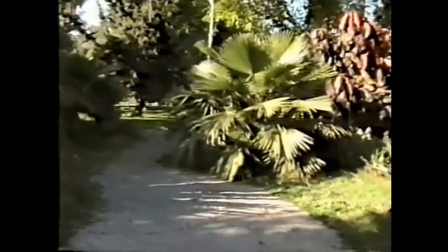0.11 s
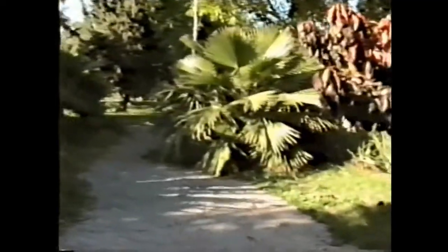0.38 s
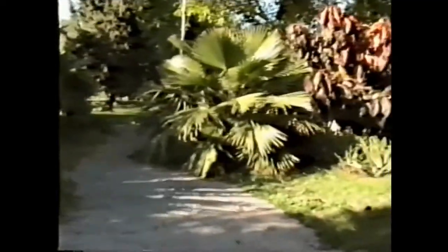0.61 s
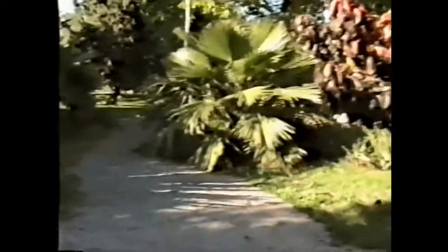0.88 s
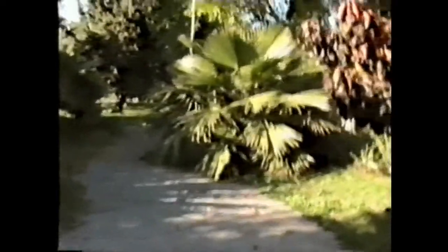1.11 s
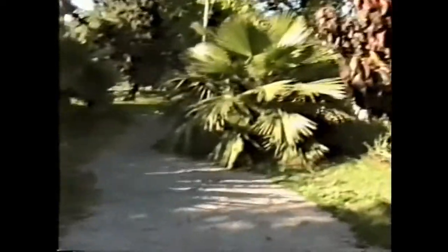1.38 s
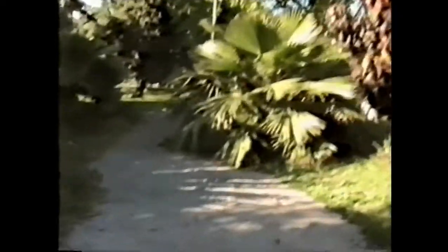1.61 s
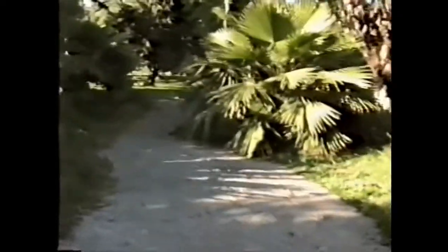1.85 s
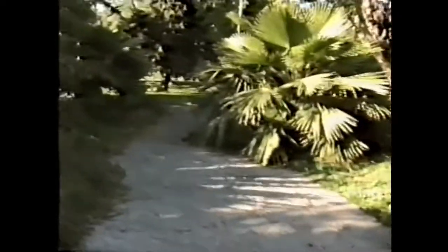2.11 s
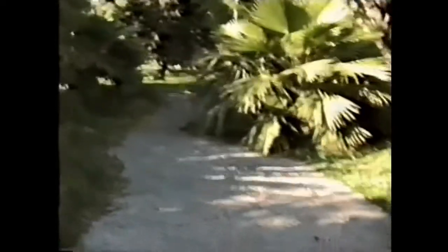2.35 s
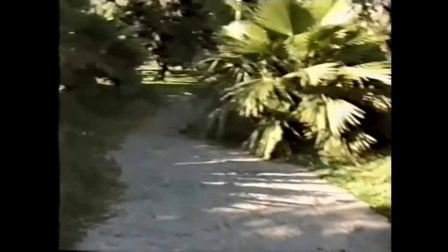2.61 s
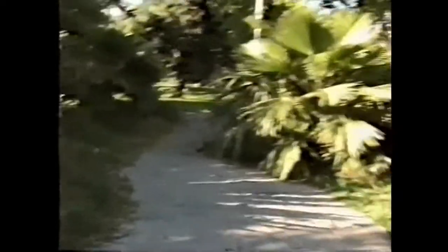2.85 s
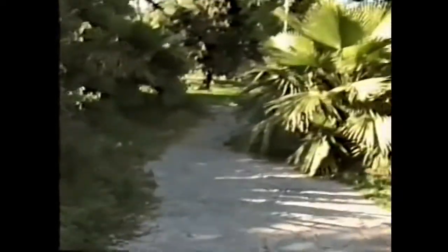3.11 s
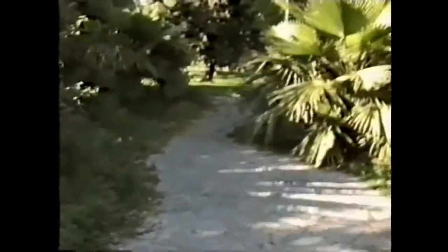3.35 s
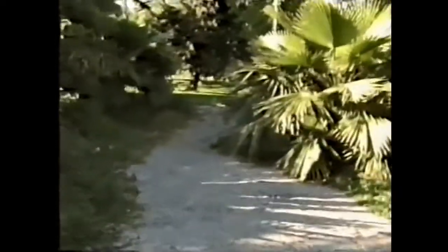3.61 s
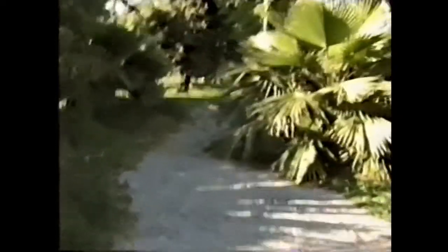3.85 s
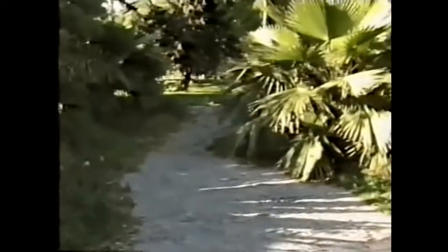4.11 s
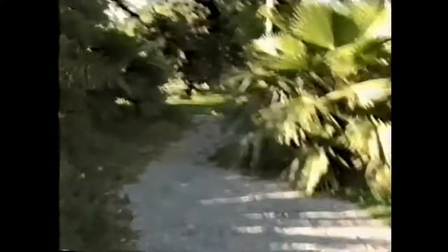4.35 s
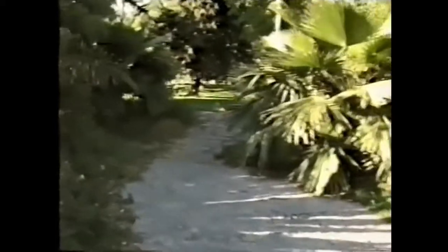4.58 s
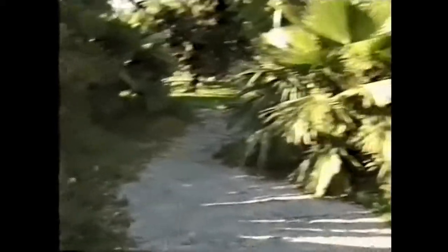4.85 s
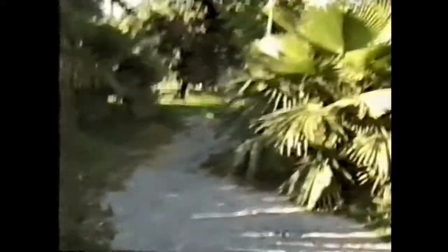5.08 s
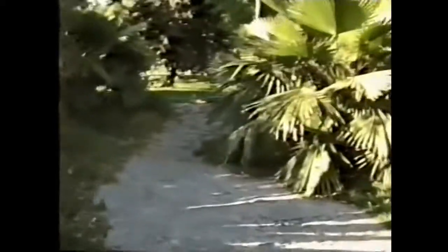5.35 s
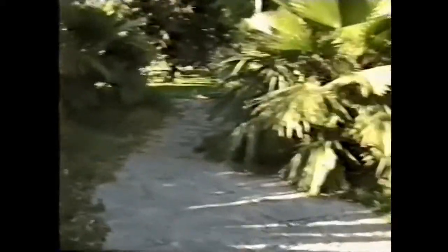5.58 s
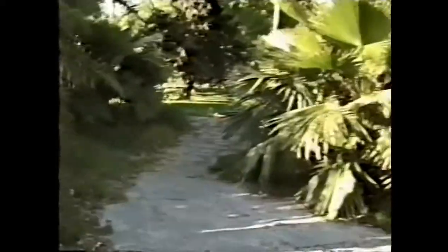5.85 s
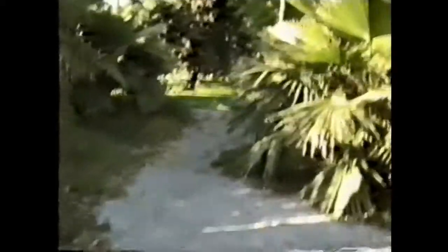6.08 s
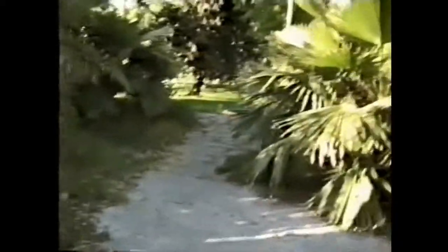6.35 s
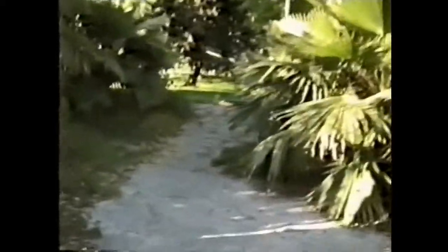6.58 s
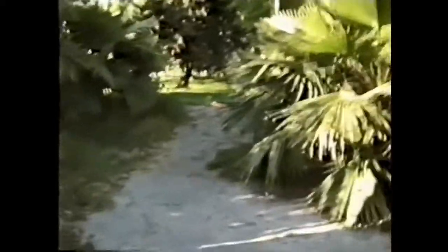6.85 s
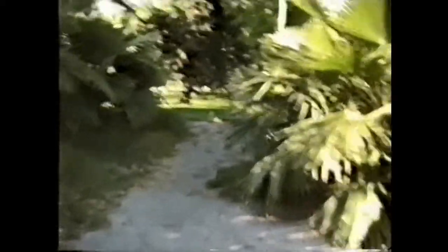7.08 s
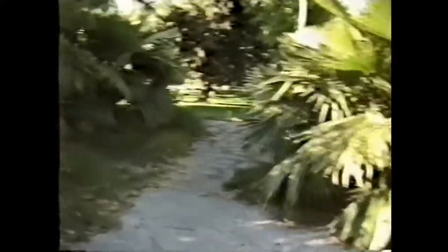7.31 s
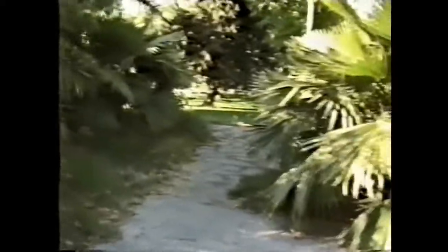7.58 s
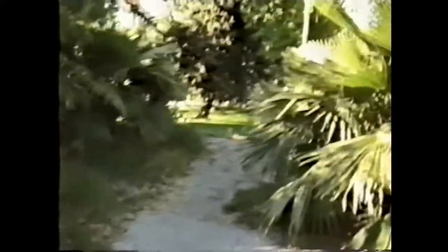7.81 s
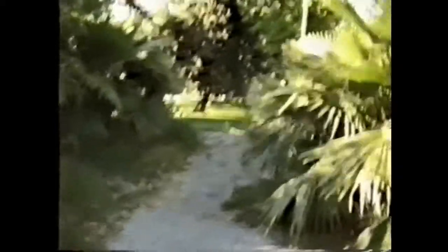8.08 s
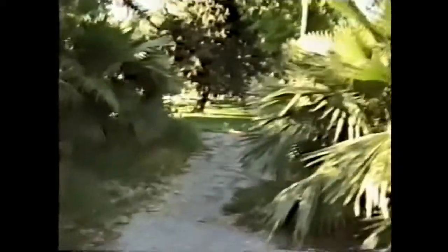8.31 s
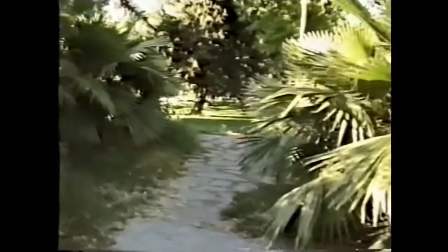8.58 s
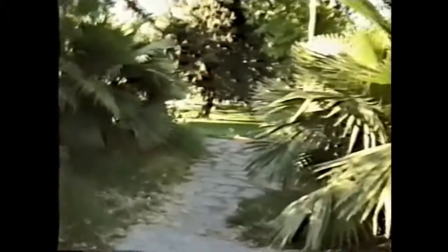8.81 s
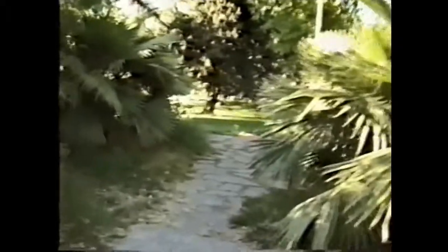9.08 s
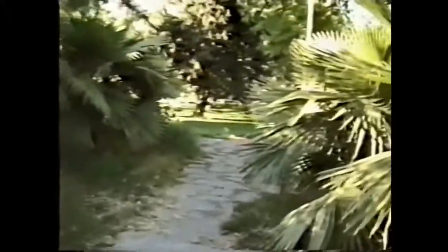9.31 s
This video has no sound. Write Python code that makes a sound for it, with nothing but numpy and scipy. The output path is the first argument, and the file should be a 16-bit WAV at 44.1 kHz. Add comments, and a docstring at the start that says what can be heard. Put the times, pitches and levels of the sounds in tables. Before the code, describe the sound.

Busy birdsong with loud whistles, thin seeps and rasping chatter over slow gravel footsteps, soft dove coos and leaf hiss.

```python
"""Throughout, far traffic rumbles under a hiss of leaves and distant chirps, and the recorder whines faintly (noise, tones).
From the start a dove coos softly, a warble opens and a walker's shoes snap and scuff gravel (rings, noise grains).
Many small birds follow with two-voiced calls, whistles, thin seeps, harsh notes and burrs (trembling near sines).
Later comes fast, rasping chatter, and a far engine hums towards the end. Trees echo song and steps (scattered taps);
the loudest notes overload the input."""
import sys
import numpy as np
from scipy import signal
from scipy.fft import rfft, irfft
from scipy.io import wavfile
from scipy.ndimage import uniform_filter1d

SR = 44100
rng = np.random.default_rng(int(sys.argv[2]) if len(sys.argv) > 2 else 0)


def amplitude_ratio(level_db):
    """Convert a level in decibels to the matching linear amplitude (field) ratio."""
    exponent = np.asarray(level_db, float) / 20
    return 10 ** exponent


def unload_audio(sound):
    """Save the sound as a 16-bit wav file, at the path given as the first command line argument."""
    columns = np.transpose(np.atleast_2d(sound))
    # keep every value between -1 and 1, then stretch to whole-number steps
    steps = np.round(np.clip(columns, -1, 1) * 32767)
    wavfile.write(sys.argv[1], SR, steps.astype(np.int16))


N = 416304

# colour of crushed grit, relative: (frequency [Hz], density [dB per Hz])
GRIT_COLOUR = [(410, -34.5), (700, -25), (940, -8), (2140, 13), (10200, -1.5), (15000, -19)]


def evened(x):
    """Scales a signal to rms 1."""
    return x / np.sqrt(np.mean(x ** 2) + 1e-20)


def read(points, hz):
    """Reads a curve over log frequency."""
    f, value = np.transpose(points)
    return np.interp(np.log(hz + 1), np.log(f + 1), value)


def add(mix, s, sound):
    """Lays a sound into the mix at s seconds, cut at the end of the scene."""
    part = mix[round(s * SR):][:len(sound)]
    part += sound[:len(part)]


def curves(rows):
    """Columns at every sample, corners rounded over about 1 ms."""
    s, *columns = np.transpose(rows)
    t = np.arange(s[0], s[-1], 1 / SR)
    return [uniform_filter1d(np.interp(t, s, c), size=50, mode="nearest") for c in columns]


def coloured(x, points):
    """Filters x by a spectrum."""
    return irfft(rfft(x) * amplitude_ratio(read(points, np.fft.rfftfreq(len(x), 1 / SR))), len(x))


def faded(x, fade_s=0.0026):
    """Soft ends."""
    k = np.arange(len(x))
    return x * np.clip(np.minimum(k, k[::-1]) / (fade_s * SR), 0, 1)


def wobble(count, size):
    """Smooth chance of rms 1, changing about every size samples."""
    return evened(uniform_filter1d(uniform_filter1d(rng.standard_normal(count), size), size))


def voice(hz, db, waver=0.00681, flutter=0.3943, overtone_db=0, fade_s=0.00092, rasp=0., smear=0.):
    """A near sine trembling in pitch and strength; rasp roughens it, turbulence smears overtones into hiss."""
    # overtones against the fundamental, before overtone_db: (frequency [Hz], level [dB])
    throat = [(3000, -23), (7000, -25), (9800, -34.5), (12000, -33), (15000, -90)]
    hz = hz * (1 + waver * wobble(count=len(hz), size=120))
    turn = 2 * np.pi * np.cumsum(hz) / SR
    overtones = sum(amplitude_ratio(read(throat, k * hz)) * np.sin(k * turn) for k in range(2, 6))
    overtones = overtones * (1 - smear + smear * wobble(count=len(hz), size=8))
    tone = np.sin(turn) + amplitude_ratio(overtone_db) * overtones
    tremble = flutter * wobble(count=len(hz), size=200)
    roughness = rasp * wobble(count=len(hz), size=9)
    return faded(np.sqrt(2) * amplitude_ratio(db) * (1 + tremble + roughness) * tone, fade_s)


def glide(s, length, first_hz, last_hz, db, peak, start_db, end_db, bend):
    """Rows (time [s], pitch [Hz], level [dB]) of a note that slides one way while it swells and fades."""
    u = np.linspace(0, 1, 25)
    hz = last_hz + (first_hz - last_hz) * (1 - u) ** bend
    swell_db = np.interp(u, [0, np.clip(peak, .02, .98), 1], [start_db, 0, end_db])
    return np.transpose([s + length * u, hz, db + swell_db])


def arch(s, length, foot_hz, top_hz, db, top_at, edge_db, rounded):
    """Rows (time [s], pitch [Hz], level [dB]) of a note whose pitch and level rise and fall together."""
    u = np.linspace(0, 1, 25)
    height = np.sin(np.pi * np.interp(u, [0, top_at, 1], [0, .5, 1])).clip(0) ** rounded
    return np.transpose([s + length * u, foot_hz + (top_hz - foot_hz) * height, db + edge_db * (1 - height)])


def traffic_and_leaves(patchy_db=2.0):
    """Noise split at 900 Hz: rumble below and hiss above swell separately, in drifting patches."""
    # colour of the open air, relative within each part: (frequency [Hz], density [dB per Hz])
    air = [(18, -76.5), (30, -90.5), (214, 0.5), (660, -10), (773, -16.5), (1530, -9.5), (1740, -9),
           (2940, -11.5), (3180, -12), (4840, -23), (15700, -34)]
    # background: (time [s], traffic rumble level [dB], far chorus and leaves level [dB])
    swell = [(0.0, -39, -34.5), (2.92, -38, -36), (9.44, -33, -31.5)]
    frames, hz = N // 256 + 5, np.fft.rfftfreq(1024, 1 / SR)
    a, b, patches = rng.standard_normal((frames, 513, 3)).T
    patches = evened(uniform_filter1d(uniform_filter1d(patches, size=10, axis=0), size=14, axis=1))
    z = (a + 1j * b) * amplitude_ratio(read(air, hz)[:, None] + patchy_db * patches)
    low = (hz < 900)[:, None]
    rumble, hiss = (evened(signal.istft(z * m, nperseg=1024, noverlap=768)[1][:N]) for m in (low, ~low))
    s, rumble_db, hiss_db = np.transpose(swell)
    t = np.arange(N) / SR
    return rumble * amplitude_ratio(np.interp(t, s, rumble_db)) + hiss * amplitude_ratio(np.interp(t, s, hiss_db))


def recorder_whine():
    """A faint, slightly unsteady tone around 1500 Hz that never stops."""
    return voice(np.full(N, 1500.0), -47, waver=0.00328, overtone_db=-27.0)


def dove():
    """Soft coos: low, nearly pure tones with slow edges."""
    # one table a coo: (time [s], pitch [Hz], level [dB])
    coos = [
        [(0, 352, -37), (.22, 303.4, -46)],
        [(3.151, 395.4, -37.5), (3.269, 440.4, -37), (3.391, 473.1, -34)],
        [(5.59, 233.2, -39), (5.72, 313, -39.5)],
        [(5.85, 449, -35), (5.97, 570.5, -43.5)],
    ]
    mix = np.zeros(N)
    for rows in coos:
        add(mix, rows[0][0], voice(*curves(rows), flutter=0.307, overtone_db=-40, fade_s=0.0068))
    return mix


def whistle(rows):
    """A clean note with weak overtones."""
    return voice(*curves(rows), overtone_db=-6)


def flock():
    """Short falling chirps of distant birds at random times and pitches."""
    chirps_per_s, faintest_db = 45, -54
    mix = np.zeros(N)
    for when, pitch, fall, length, size in rng.random((round(chirps_per_s * N / SR), 5)):
        hz, db = 2000 * 3.6 ** pitch, faintest_db + 9 * size
        add(mix, when * N / SR, whistle([(0, hz * (1 + 0.33 * fall), db), (.02 + .06 * length, hz, db)]))
    return mix


def warble(rows):
    """The pitch swings up and down quickly, nearly in time, and the level swings with it."""
    hz, db, swing_hz, per_s, top_db = curves(rows)
    swing = np.cos(2 * np.pi * np.cumsum(per_s * (1 + .08 * wobble(count=len(hz), size=500))) / SR)
    swing = 2 * ((1 + swing) / 2) ** .65 - 1  # lingers at the top and dips briefly
    swing_db = top_db * swing * swing_hz / swing_hz.max()
    return voice(hz + swing_hz * swing, db + swing_db, waver=0.0082, overtone_db=-8.0)


def warbles():
    """Warbles begin plain, then open their swing from the top."""
    # one pair a warble: (swing [Hz], rate [swings per s], gain at the top [dB], plain lead [s]),
    # then its line: (time [s], centre pitch [Hz], level [dB])
    long_warbles = [ ((237, 60.7, 1.14, 0.00728), [(.058, 2079, -24.5), (.072, 2083, -14.5),
                    (.115, 2010, -15.5), (.145, 2246, -13.5), (.17, 2494, -8.5), (.19, 2694, -8),
                    (.205, 2670, -30)]), ((485, 16, -0.5, .06), [(1.912, 7860, -37.5), (1.93, 8150, -30),
                    (1.958, 6720, -26.5), (1.985, 7022, -22), (2.04, 6975, -21.5), (2.15, 6436, -33.5)]),
                    ((370, 59.4, 5, .033), [(5.968, 2575, -24.5), (6.0, 2652, -12.5), (6.045, 2700, -9),
                    (6.13, 2780, -9.5), (6.2, 2680, -10.5), (6.23, 2480, -13), (6.26, 2250, -14),
                    (6.3, 2080, -16), (6.36, 2030, -21)]), ((313, 60, 1.23, 0.00085), [(9.15, 2048, -24.5),
                    (9.2, 1992, -22), (9.3, 2352, -24), (9.335, 2249, -33), (9.36, 2170, -18),
                    (9.44, 2354, -21)]), ]
    grow_s = 0.0206
    notes = []
    for (swing, per_s, top_db, lead), rows in long_warbles:
        s, centre_hz, level_db = np.transpose(rows)
        t = np.linspace(0, s[-1] - s[0], 200)
        hz, db = np.interp(s[0] + t, s, centre_hz), np.interp(s[0] + t, s, level_db)
        opening = swing * np.clip((t - lead) / grow_s, 0, 1)
        rate = per_s * np.clip((t - lead) * 1000 + .5, 0, 1)
        notes.append(np.transpose([s[0] + t, hz, db, opening, rate, np.full(200, top_db)]))
    return notes


def snaps():
    """Grit snapping underfoot: a noisy crack and a short ring."""
    # (time [s], level [dB], ring [Hz])
    grit_snaps = [(0.125, -18.5, 3158), (.228, -27.5, 6545), (0.504, -22.5, 1295), (0.6115, -20, 2530),
                  (1.07, -18.5, 1123), (1.484, -12, 1150), (2.184, -18, 3870), (2.2247, -18, 4023),
                  (2.245, -20.5, 2329), (2.605, -20, 3200), (2.672, -10, 1680), (2.779, -21.5, 3610),
                  (3.394, -23.5, 4370), (3.7778, -16, 1865), (4.218, -13, 1195), (4.366, -18, 3690),
                  (4.9902, -11, 1930), (5.381, -24.5, 1059), (5.7266, -23.5, 3600), (5.758, -21.5, 3630),
                  (5.957, -19, 2650), (6.361, -12.5, 1300), (7.867, -21.5, 2550), (8.08, -18.5, 3435),
                  (8.132, -21.5, 3390)]
    ring_t60_s, crack_t60_s, crack_share = 0.0124, 0.0514, 0.429
    mix, t = np.zeros(N), np.arange(700) / SR
    for s, db, hz in grit_snaps:
        ring = np.sin(2 * np.pi * hz * t) * amplitude_ratio(-60 * t / ring_t60_s)
        crack = evened(coloured(rng.standard_normal(len(t)), GRIT_COLOUR)) * amplitude_ratio(-60 * t / crack_t60_s)
        add(mix, s, amplitude_ratio(db) * (ring + crack_share * crack))
    return mix


def duet(rows, even=0.268, odd=1.0):
    """Two voices share one airway, so sum and difference tones appear; the beak passes the middle treble best."""
    low_hz, low_db, high_hz, high_db = curves(rows)
    low = voice(low_hz, low_db, flutter=0.038, overtone_db=-29.5)
    both = low + voice(high_hz, high_db, flutter=0.025, overtone_db=-29.5)
    flow = both / (np.sqrt(2) * (amplitude_ratio(low_db) + amplitude_ratio(high_db)))
    mixed = both * (0.595 + even * flow + odd * flow ** 2 + 0.362 * flow ** 3)
    mixed = signal.lfilter(*signal.butter(1, 6000, fs=SR), mixed)
    return signal.sosfilt(signal.butter(6, [2100, 12000], "band", fs=SR, output="sos"), mixed)


def nasal_calls():
    """One nasal call from both sides of the syrinx."""
    # (time [s], low voice [Hz], low level [dB], high voice [Hz], high level [dB])
    nasal = [(0.26, 2882, -15.5, 3262, -22), (0.272, 2865, -14.5, 3644, -8.5),
             (0.3, 2767, -8.5, 3713, -4.5), (0.325, 2670, -3, 3503, -12), (0.338, 2716, -21, 3756, -30.5)]
    return [nasal]


def whistles():
    """Clean whistles that swell and fade; the earlier the peak, the quicker the slide."""
    # (time [s], length [s], first pitch [Hz], last pitch [Hz], peak level [dB], peak position [share 0-1])
    swelling = [(0.323, 0.0257, 2750, 2484, -5.5, 0.14), (0.752, 0.033, 3171, 3502, -4.5, 0.83),
                (0.782, 0.0216, 3350, 6350, -23, 0.04), (0.858, 0.199, 2302, 2404, -5.5, 0.86),
                (1.083, 0.065, 2395, 2379, -20, 0.7), (1.501, 0.054, 1930, 1854, -29.5, 0.47),
                (2.08, 0.0605, 2120, 2199, -33, 0.39), (3.075, 0.0815, 5250, 5670, -29, 0.69),
                (3.145, 0.057, 5750, 6515, -38, 0.41), (8.144, .034, 4700, 3552, -10.5, 0.67),
                (1.795, 0.154, 1975, 1925, -31, 0.52), (2.409, 0.272, 2836, 2580, -36, 0.05),
                (3.93, 0.27504, 3198, 2632, -29.5, 0.12), (4.882, 0.057, 2105, 2296, -11.5, 0.57),
                (4.917, 0.031, 5750, 4050, -32, .3), (5.172, .045, 3250, 1740, -20.5, .7),
                (5.271, 0.0647, 2062, 2308, -11.5, 0.57), (5.302, 0.0258, 3330, 3980, -33.5, 0.44),
                (5.5, 0.129, 1627, 1373, -26.5, 0.05), (5.696, 0.16, 2211, 1767, -13, 0.4),
                (6.395, .067, 2280, 2749, -4.5, .65), (6.461, 0.117, 2700, 2594, -19, 0.33),
                (7.063, 0.0716, 3270, 3403, -24.5, 0.08), (7.086, 0.0674, 1644, 1726, -24, 0.89),
                (7.12, 0.1015, 2527, 2447, -10, 0.43), (7.318, 0.1805, 2027, 1871, -10.5, 0.64),
                (7.855, 0.212, 8140, 8326, -35.5, 0.84), (8.741, .16, 2190, 2080, -30, .3),
                (8.799, 0.05, 6250, 6695, -26, 0.49), (8.959, 0.1, 3105, 3071, -25, .3),
                (8.96, 0.172, 1526, 1482, -31, 0.36)]
    return [glide(*row, start_db=-13, end_db=-11.5, bend=1.3 / np.sqrt(row[5])) for row in swelling]


def flicks():
    """Chips that dip to a low note, hold it and flick up."""
    # (time [s], low pitch [Hz], top pitch [Hz], level [dB])
    chips = [(.797, 2833, 5550, -6.5), (.819, 2877, 5560, -5), (0.838, 2833, 4780, -5.5)]
    dip_s, hold_s, rise_s, edge_db = 0.0058, 0.0072, 0.0025, -4.5
    return [[(s, low * 1.4, db + edge_db),
             (s + dip_s, low, db),
             (s + dip_s + hold_s, low, db),
             (s + dip_s + hold_s + rise_s, top, db + 2 * edge_db)] for s, low, top, db in chips]


def seeps():
    """Thin, mostly high notes that slide quickly to a held pitch and die away."""
    # (time [s], length [s], first pitch [Hz], held pitch [Hz], level [dB])
    thin_notes = [(1.088, 0.162, 6093, 5649, -28.5), (1.539, 0.1085, 5842, 5698, -26),
                  (1.998, 0.0593, 5960, 5465, -24.5), (2.346, .12, 5400, 5243, -39),
                  (2.48, .24, 5950, 5560, -28), (2.858, .11, 5430, 5280, -39),
                  (3.041, .05, 5745, 5520, -24), (3.57, 0.166, 5784, 5551, -28),
                  (4.483, 0.071, 7150, 6198, -38.5), (4.652, 0.112, 6970, 6246, -41.5),
                  (4.787, 0.11, 5598, 5225, -41.5), (5.128, 0.12, 6650, 6205, -45),
                  (5.271, 0.213, 5415, 5247, -44), (7.842, 0.093, 5995, 5773, -32),
                  (7.978, 0.144, 6136, 5903, -35), (8.86, 0.039, 6360, 6430, -21),
                  (5.762, 0.16, 9920, 8800, -41.5)]
    return [glide(*row, peak=.18, start_db=-6, end_db=-14, bend=4.5) for row in thin_notes]


def chatter(rows):
    """A rasping, shaky note with short ends and overtones partly smeared into hiss."""
    return voice(*curves(rows), waver=0.0105, flutter=0.3, overtone_db=10.454, fade_s=0.00054,
                 rasp=.1262, smear=.75)


def strokes():
    """Strokes of chatter that glide one way."""
    # (time [s], length [s], first pitch [Hz], last pitch [Hz], level [dB], bend [over 1 = quick at first])
    one_way = [(1.217, .035, 3336, 5527, -24, 1.6), (1.296, 0.022, 5250, 3294, -13.5, 1.6),
               (1.356, 0.022, 3830, 4560, -29, 1.5), (1.4, .024, 5330, 2875, -13.5, 0.97),
               (6.571, .044, 3241, 4637, -11, 6.97), (6.635, 0.0155, 4250, 4902, -6, 1.99),
               (6.651, .005, 4920, 3940, -8, 1.13), (6.666, 0.02156, 2716, 3332, -19.5, 1.4103),
               (6.7, .03, 3800, 3050, -19, .8), (6.803, 0.022, 3073, 3221, -19, 2.05),
               (7.509, 0.0159, 2564, 4000, -17, 0.783), (7.562, 0.0042, 5280, 3980, -22, 1.483),
               (7.579, .013, 3000, 4090, -12, 1.53), (7.634, 0.00895, 2820, 3630, -17, 0.89),
               (7.641, 0.0096, 3950, 5050, -17, 1.72), (6.694, 0.0054, 3410, 4400, -7.5, 1.21),
               (8.217, .045, 2600, 1928, -31, 1.2), (4.868, 0.0095, 3974, 3345, -24.5, 1.31),
               (4.886, 0.0124, 3424, 2926, -25.5, 1.08), (5.2, 0.015, 2844, 1907, -29, 1.02),
               (5.234, 0.01182, 1974, 3667, -28.5, 0.996), (5.257, 0.00973, 2237, 4010, -26, 0.767),
               (5.271, .009, 2666, 4143, -34, 1.027), (1.757, 0.00893, 3605, 5167, -21, 1.61),
               (8.279, 0.0238, 3660, 4297, -11.5, 5.01), (8.301, 0.0122, 4348, 5296, -18, 0.792),
               (8.312, 0.0091, 4225, 3736, -13.5, 1.083), (8.317, 0.00664, 3750, 6140, -19, 0.79),
               (8.334, .05, 5790, 7374, -25, 10.4), (8.365, 0.017, 5920, 3922, -21, 1.125)]
    return [glide(*row, peak=.6, start_db=-6, end_db=-3, bend=bend) for *row, bend in one_way]


def chirrups():
    """Two voices arching together."""
    # (time [s], length [s], low voice top [Hz], high voice top [Hz], low voice level [dB])
    pairs = [(1.236, .062, 3717, 5940, -17), (1.348, .058, 3805, 5795, -16)]
    foot, high_db = .62, 3  # foot as a share of the top pitch
    shape = dict(top_at=.52, edge_db=-5, rounded=1.7)
    notes = []
    for s, length, low, high, db in pairs:
        low_voice = arch(s, length, foot * low, low, db, **shape)
        high_voice = arch(s, length, foot * high, high, db + high_db, **shape)
        notes.append(np.c_[low_voice, high_voice[:, 1:]])
    return notes


def hook(rows):
    """A rasping note rich in overtones."""
    return voice(*curves(rows), waver=0.0109, overtone_db=14.994, fade_s=0.00042, rasp=.174636)


def hooks():
    """Harsh notes that plunge and hook upwards."""
    # (time [s], top pitch [Hz], bottom pitch [Hz], level [dB])
    plunging = [(1.466, 5155, 3037, -16.5), (1.552, 5248, 2985, -18.5), (1.649, 5270, 2981, -18.5),
                (1.755, 4954, 3014, -20.5)]
    plunge_s, hook_s, hold_s, hook_up = 0.018, 0.0252, 0.016, 1.12
    return [[(s, top, db - 2.5),
             (s + plunge_s, low, db + 2),
             (s + plunge_s + hook_s, low * hook_up, db),
             (s + plunge_s + hook_s + hold_s, low * hook_up, db - 33)] for s, top, low, db in plunging]


def burr(rows):
    """A grainy note, shaky in pitch and strength."""
    return voice(*curves(rows), waver=.035, flutter=.7, overtone_db=4.5)


def burrs():
    """Short burry slides, a little quicker at first."""
    # (time [s], length [s], first pitch [Hz], last pitch [Hz], level [dB])
    slides = [(1.916, 0.067, 4750, 3074, -28.5), (2.331, 0.0298, 3787, 3647, -30.5),
              (2.418, .05, 4700, 3600, -31), (2.873, 0.067, 3820, 3624, -31.5),
              (2.968, .025, 4757, 4350, -33), (2.993, 0.041, 3850, 3300, -31),
              (3.403, 0.029, 4580, 4440, -36), (3.424, 0.049, 3750, 3142, -34),
              (3.52, 0.0463, 4650, 3007, -28.5), (3.585, 0.0973, 2321, 2032, -29.5),
              (6.578, 0.0695, 6600, 7270, -28), (6.673, 0.04902, 7120, 6650, -22.5),
              (8.221, 0.0316, 5354, 3617, -23.5), (5.221, 0.0476, 1904, 2022, -29),
              (5.274, 0.0118, 4200, 4260, -33), (3.311, 0.1875, 1956, 2092, -32.5),
              (8.175, 0.0454, 3553, 2754, -20.5)]
    return [glide(*row, peak=.55, start_db=-4, end_db=-5, bend=1.2) for row in slides]


def scuffs():
    """Soles dragging over gravel: dense noise grains of uneven strength that die away."""
    # (time [s], starting level [dB], length [s])
    drags = [(2.671, -24.5, 0.174), (4.971, -26, 0.029), (7.046, -32, 0.43), (8.481, -27, 0.129),
             (8.699, -32, 0.02402), (9.182, -28, 0.202)]
    mix = np.zeros(N)
    grains = rng.standard_normal(N) * amplitude_ratio(2.94 * rng.exponential(1, N))
    grains = evened(coloured(grains, GRIT_COLOUR))
    for s, db, length in drags:
        part = grains[round(s * SR):][:round(length * SR)]
        add(mix, s, faded(part * amplitude_ratio(db - 20 * np.linspace(0, 1, len(part)) ** 2)))
    return mix


def arches():
    """Strokes of chatter that arch up and down."""
    # (time [s], length [s], foot pitch [Hz], top pitch [Hz], level [dB])
    arching = [(6.606, 0.0314, 2538, 4023, -22), (6.651, .015, 3650, 4490, -9.5),
               (6.665, .018, 3450, 4638, -14), (7.516, 0.032, 2664, 3958, -8),
               (7.543, 0.011, 3090, 3980, -6), (7.554, 0.0147, 2947, 3740, -10.5),
               (7.563, 0.0123, 3207, 4160, -12.5), (7.593, 0.03, 3031, 4190, -11),
               (7.618, 0.012158, 2959, 4146, -14), (7.668, 0.0238, 2861, 4341, -12),
               (7.689, .016, 2922, 4096, -15)]
    return [arch(*row, top_at=.65, edge_db=-5, rounded=.85) for row in arching]


def drops():
    """Harsh notes that hang high and drop steeply."""
    # (time [s], first pitch [Hz], last pitch [Hz], level [dB])
    falling = [(6.821, 5613, 2600, -18), (6.908, 5657, 3075, -22)]
    hang_s, drop_s = .014, 0.0075
    return [[(s, top, db), (s + hang_s, top * .92, db), (s + hang_s + drop_s, low, db)]
            for s, top, low, db in falling]


def far_engine():
    """A low hum that joins late, with weak overtones."""
    # (time [s], pitch [Hz], level [dB])
    hum = [(7.35, 211, -45), (7.9, 214, -38), (9.44, 216, -40)]
    mix = np.zeros(N)
    add(mix, hum[0][0], voice(*curves(hum), waver=.003, flutter=.15, overtone_db=-20))
    return mix


def descants():
    """The second voice of the chatter shoots up, then dips twice."""
    # (time [s], first pitch [Hz], top pitch [Hz], dip pitch [Hz], starting level [dB])
    second_voice = [(7.513, 2984, 8550, 6127, -22), (7.589, 4006, 8770, 6293, -23),
                    (7.662, 4440, 8797, 5790, -26)]
    shoot_s, top_s, dip_s = .019, .007, .0055
    steps = np.cumsum([0, shoot_s, top_s, dip_s, dip_s, top_s, dip_s])
    fall_db = np.linspace(0, -7, len(steps))
    return [np.c_[s + steps, [first, top, top, dip, top, top, dip], db + fall_db]
            for s, first, top, dip, db in second_voice]


def birds():
    """The singers' direct sound and what they send into the trees; loud notes send a smaller share."""
    direct, scattered = np.zeros((2, N))
    for sing, notes, echo_db in ((warble, warbles(), 2.5),
                                 (duet, nasal_calls() + chirrups(), -2),
                                 (whistle, whistles() + flicks() + seeps(), 1),
                                 (chatter, strokes() + arches() + descants(), -3.5),
                                 (hook, hooks() + drops(), -2),
                                 (burr, burrs(), 0)):
        for rows in notes:
            note, loudest_db = sing(rows), max(row[2] for row in rows)
            share_db = np.clip(-.3 * (loudest_db + 24.5), -7, -1)
            add(direct, rows[0][0], note * amplitude_ratio(-1.5))
            add(scattered, rows[0][0], note * amplitude_ratio(echo_db + share_db))
    return direct, scattered


def trees(x):
    """Scattered echoes from trunks and leaves, each band dying at its own speed."""
    # decay among the trees: (frequency [Hz], t60 [s])
    decay = [(1500, 0.419), (4000, 0.499), (10000, 0.362)]
    near_db, near_s = 7, .03  # the closest foliage answers louder, for a short while
    taps = np.zeros(SR // 2)
    at = np.arange(200, len(taps) - 20, 20)
    taps[at + rng.integers(0, 20, len(at))] = rng.choice([-1., 1.], len(at))
    taps = taps * amplitude_ratio(near_db * np.exp(-np.arange(len(taps)) / (near_s * SR)))
    hz, t, z = signal.stft(taps, SR, nperseg=256)
    tail = signal.istft(z * amplitude_ratio(-60 * t / read(decay, hz)[:, None]), SR, nperseg=256)[1]
    return signal.fftconvolve(x, tail / np.linalg.norm(tail))[:N]


def scene():
    """Song and steps with their echoes, the flock heard only through the trees, and the steady background."""
    song, scattered = birds()
    steps = snaps() + scuffs()
    echoes = trees(scattered + amplitude_ratio(-13.0) * steps + flock())
    background = traffic_and_leaves() + recorder_whine() + far_engine()
    return (song + dove() + steps + echoes + background)[None]


def band_limit(x):
    """A steep low-pass at the top of the band."""
    return signal.sosfilt(signal.butter(12, 15880, fs=SR, output="sos"), x)


def record(dry):
    """The microphone cuts bass and top, gain control ducks at loud notes and recovers slowly, peaks clip."""
    threshold_db, recovery_db_per_s, duck_share = -11, 0.854, .75
    cut = signal.sosfilt(signal.butter(2, [130, 11500], "band", fs=SR, output="sos"), dry)
    power_db = 10 * np.log10(abs(uniform_filter1d(cut[0] ** 2, size=4000)) + 1e-12)
    fall = np.arange(N) * recovery_db_per_s / SR  # dB recovered by each sample
    held_db = np.maximum.accumulate(power_db + fall) - fall
    over_db = np.maximum(held_db - threshold_db, 0)
    ducked = cut / amplitude_ratio(duck_share * uniform_filter1d(over_db, size=2000))
    return band_limit(np.clip(amplitude_ratio(3.0) * ducked, -1, 1))


dry = scene()
out = record(dry)
unload_audio(out)
```